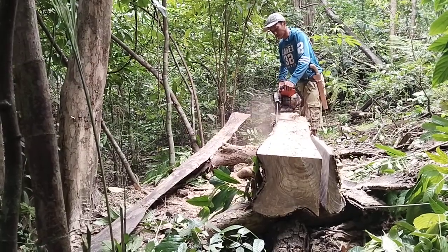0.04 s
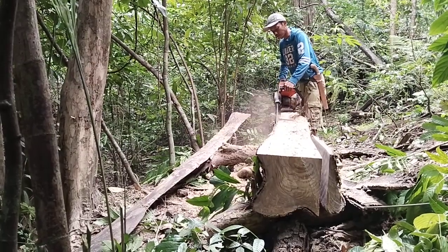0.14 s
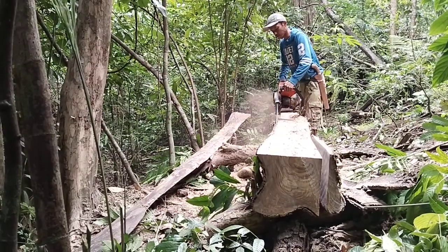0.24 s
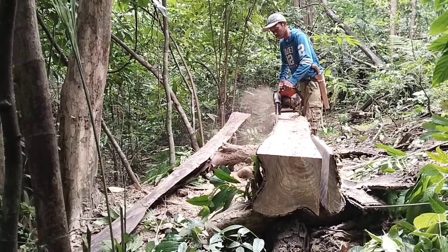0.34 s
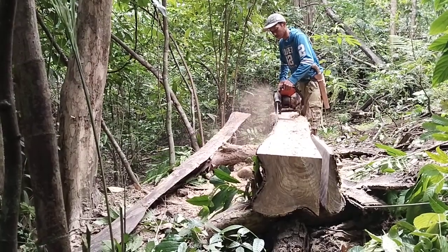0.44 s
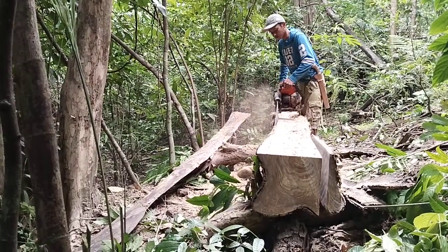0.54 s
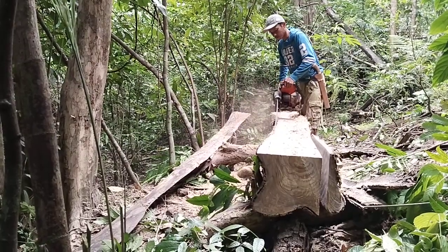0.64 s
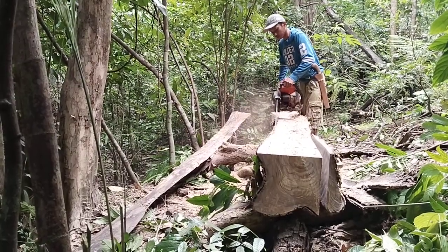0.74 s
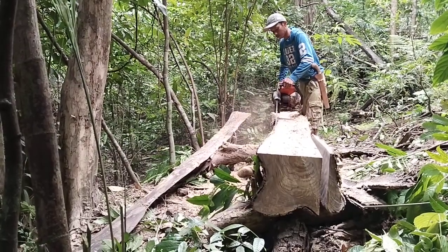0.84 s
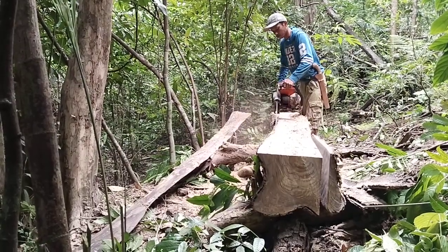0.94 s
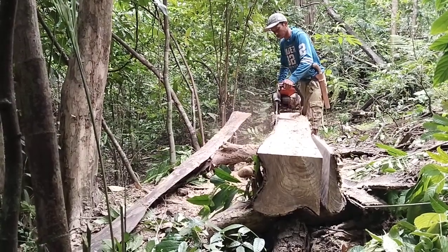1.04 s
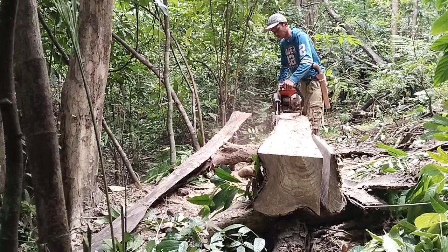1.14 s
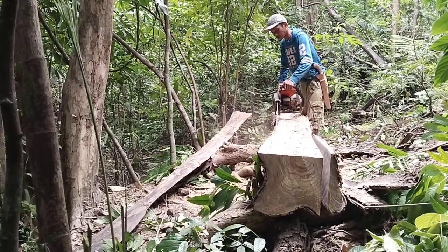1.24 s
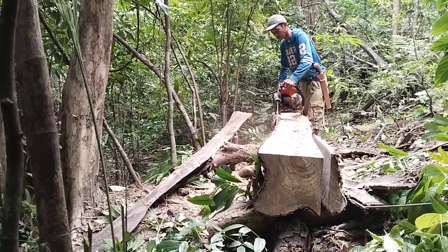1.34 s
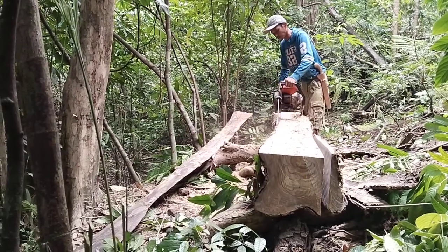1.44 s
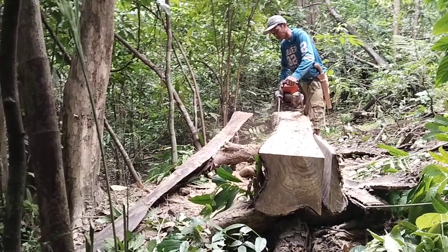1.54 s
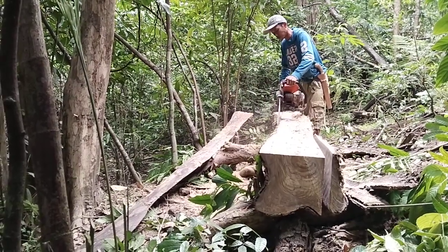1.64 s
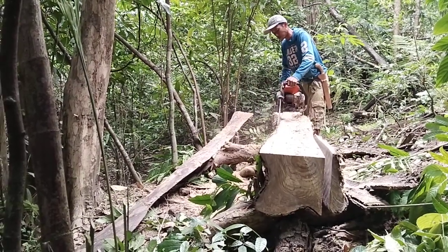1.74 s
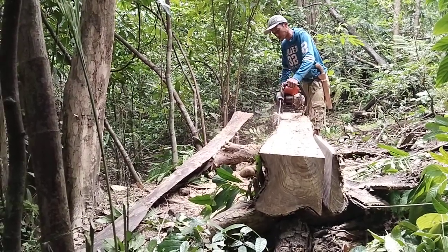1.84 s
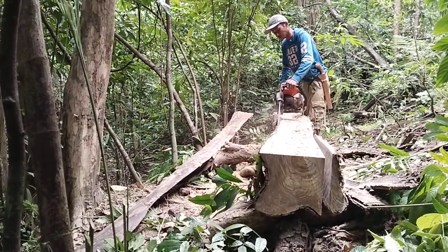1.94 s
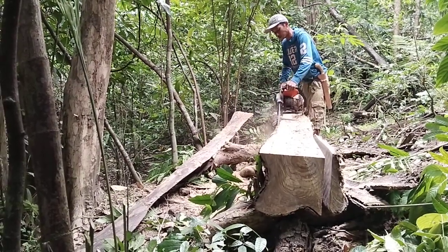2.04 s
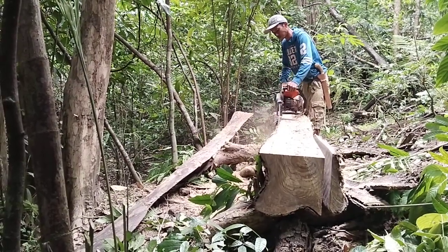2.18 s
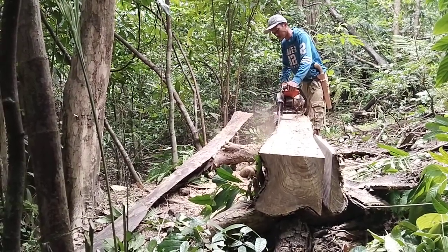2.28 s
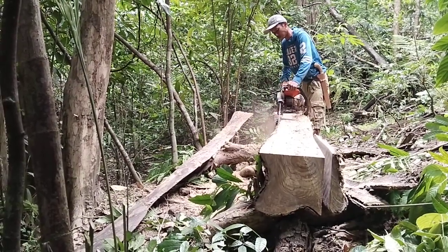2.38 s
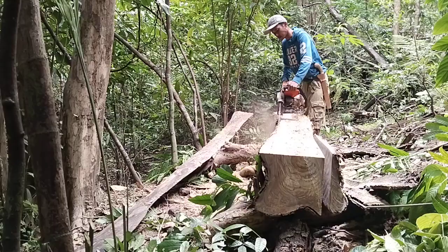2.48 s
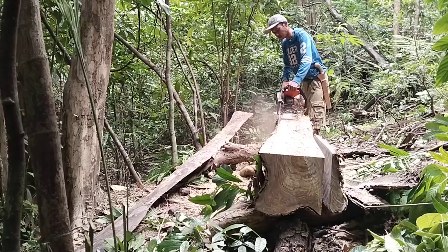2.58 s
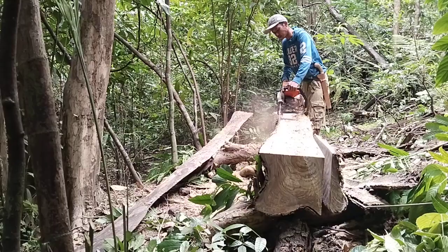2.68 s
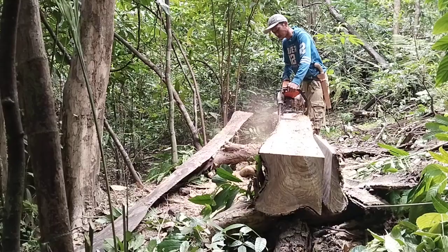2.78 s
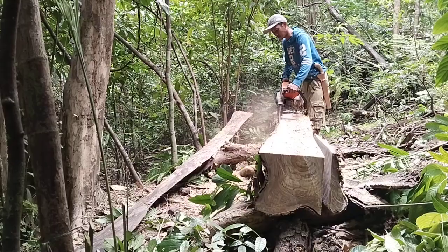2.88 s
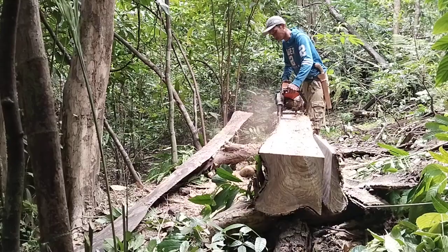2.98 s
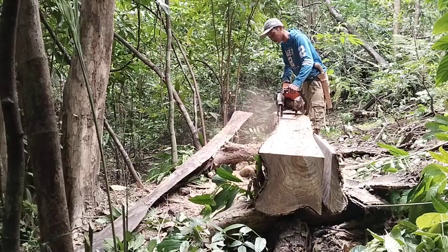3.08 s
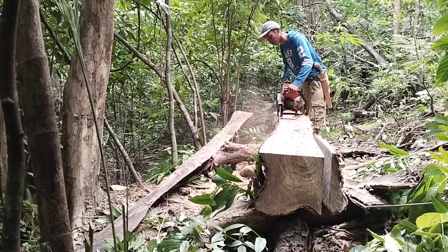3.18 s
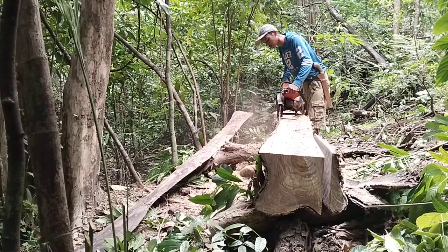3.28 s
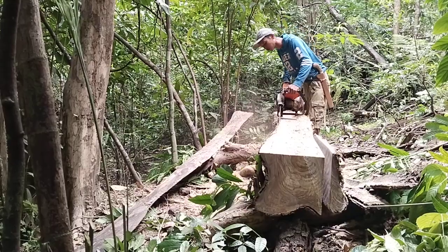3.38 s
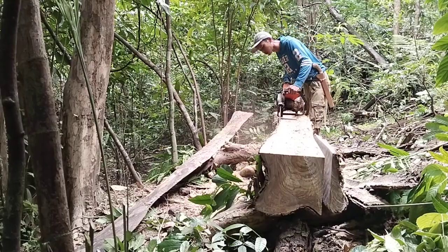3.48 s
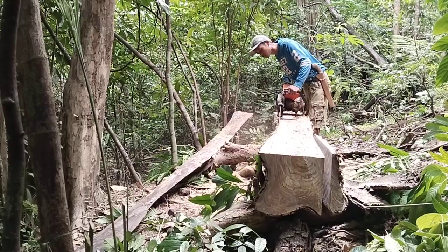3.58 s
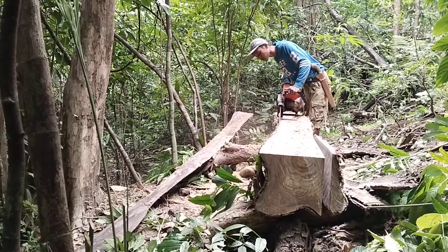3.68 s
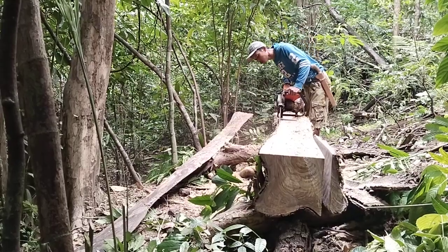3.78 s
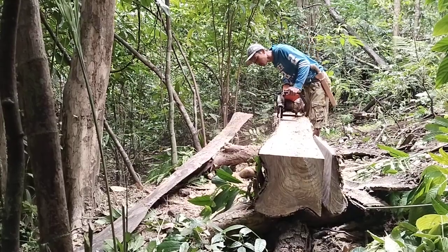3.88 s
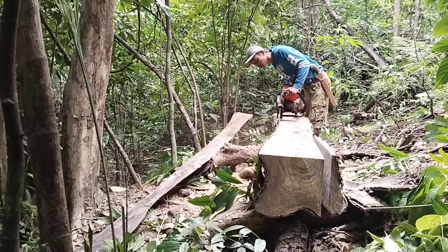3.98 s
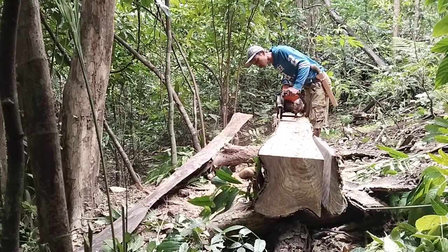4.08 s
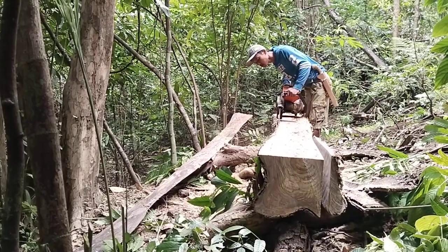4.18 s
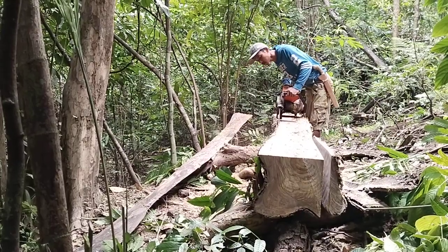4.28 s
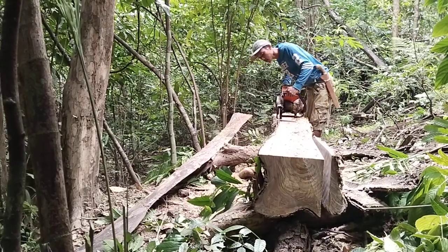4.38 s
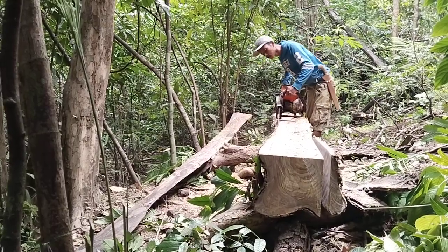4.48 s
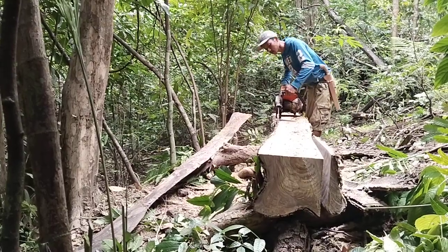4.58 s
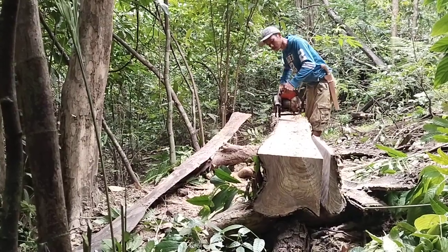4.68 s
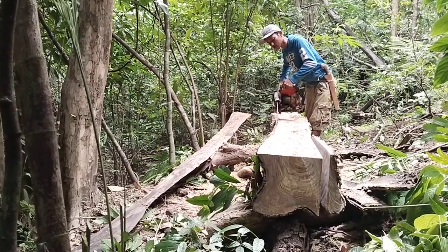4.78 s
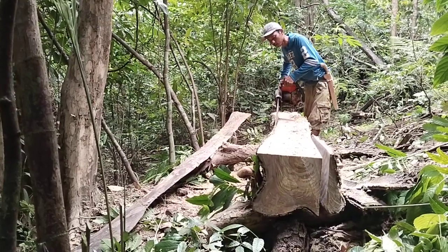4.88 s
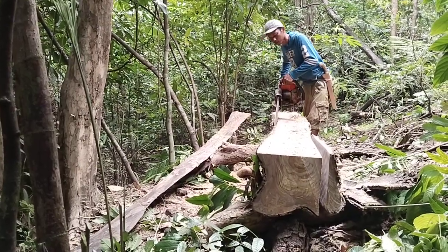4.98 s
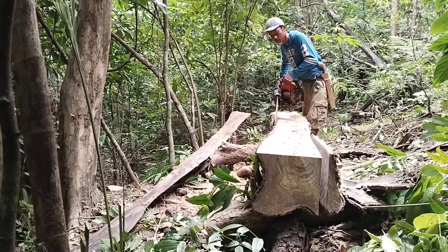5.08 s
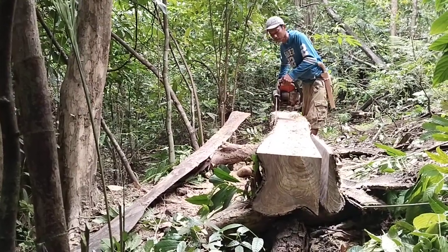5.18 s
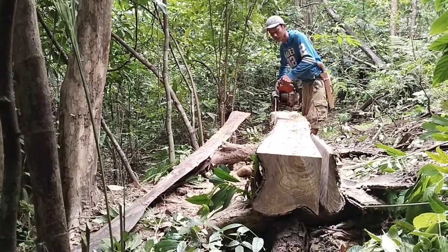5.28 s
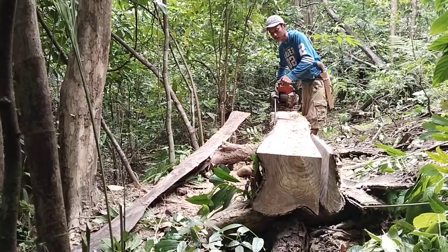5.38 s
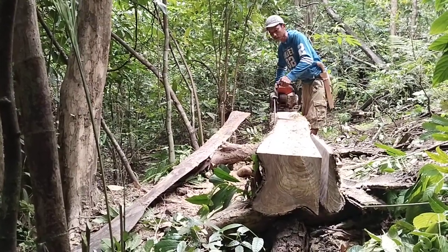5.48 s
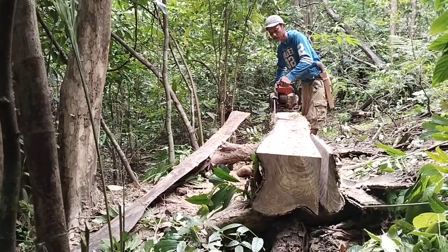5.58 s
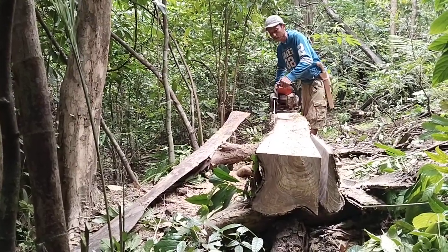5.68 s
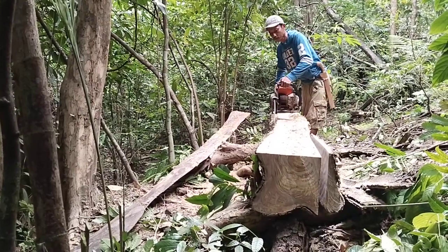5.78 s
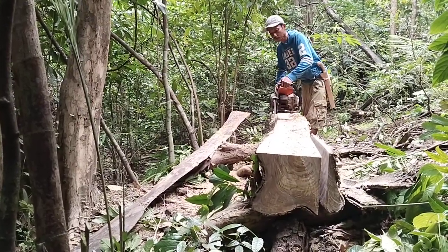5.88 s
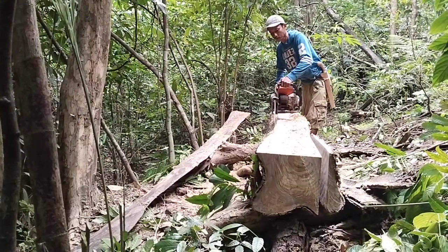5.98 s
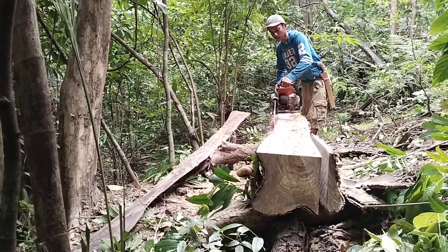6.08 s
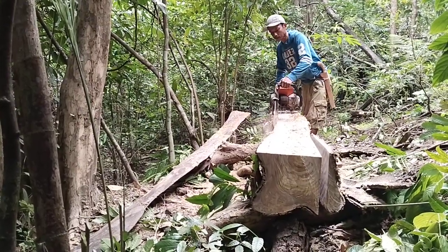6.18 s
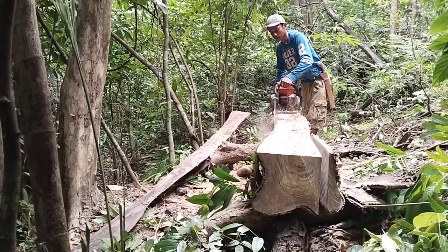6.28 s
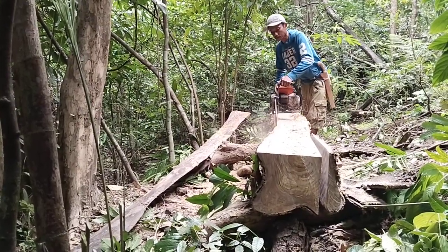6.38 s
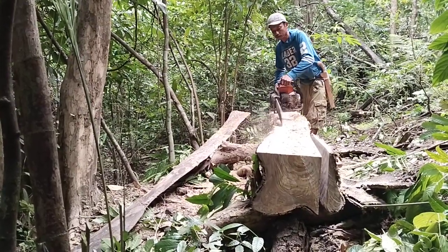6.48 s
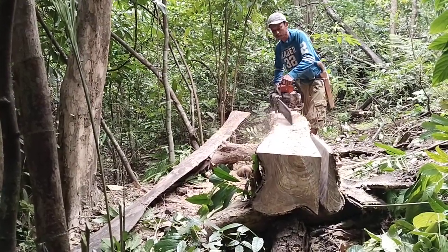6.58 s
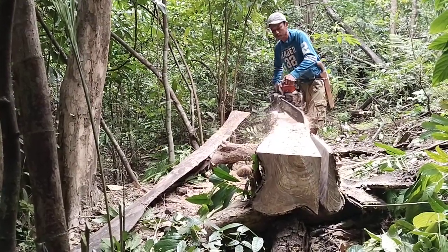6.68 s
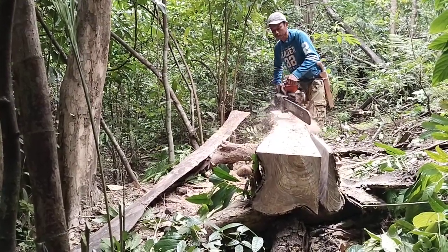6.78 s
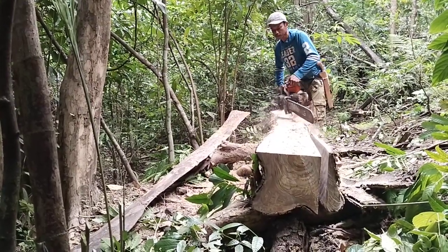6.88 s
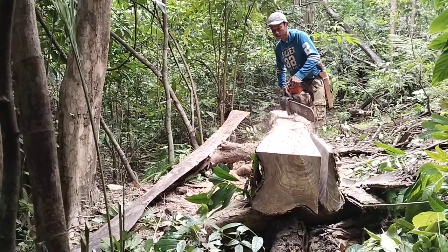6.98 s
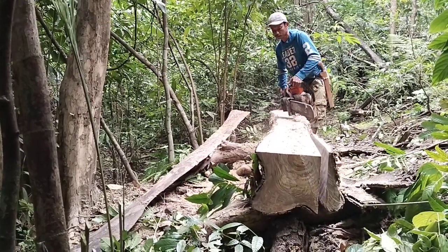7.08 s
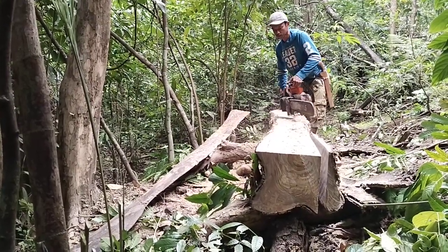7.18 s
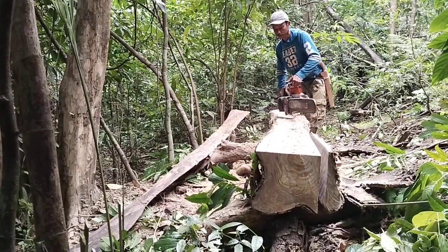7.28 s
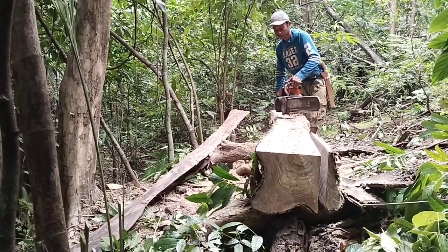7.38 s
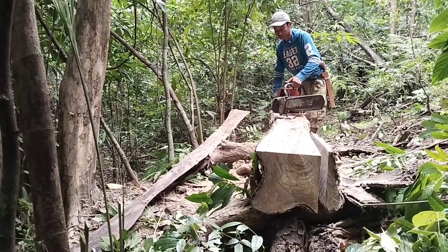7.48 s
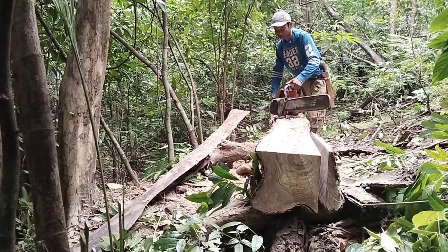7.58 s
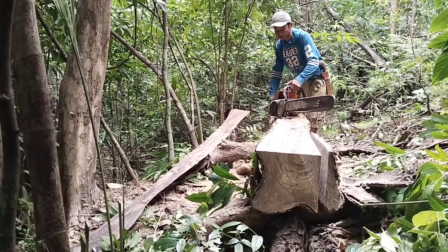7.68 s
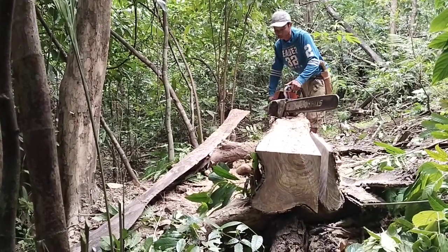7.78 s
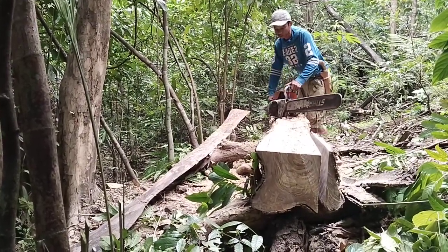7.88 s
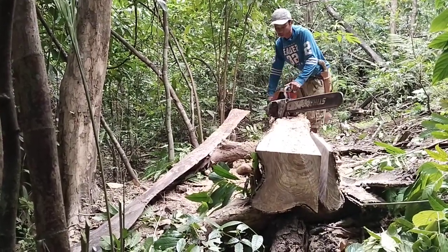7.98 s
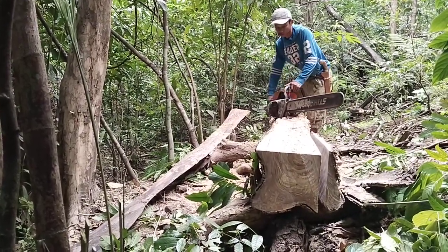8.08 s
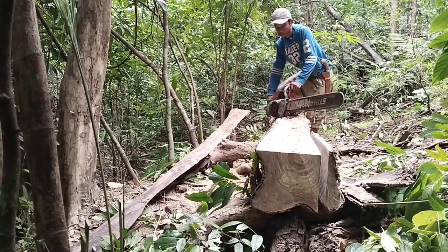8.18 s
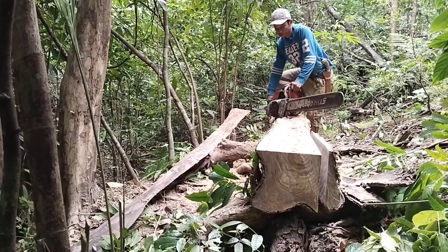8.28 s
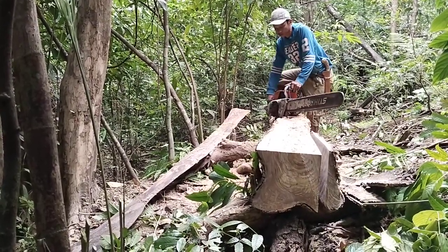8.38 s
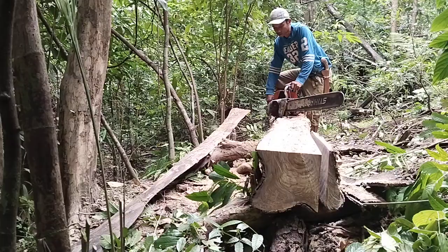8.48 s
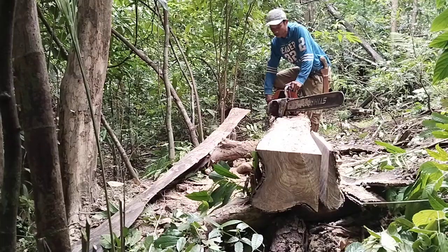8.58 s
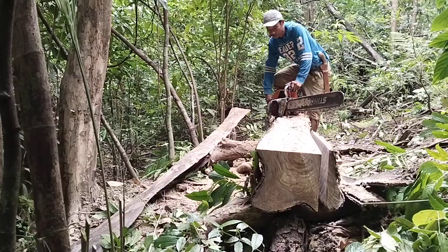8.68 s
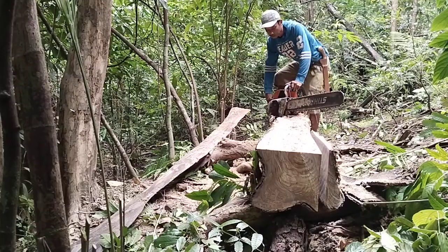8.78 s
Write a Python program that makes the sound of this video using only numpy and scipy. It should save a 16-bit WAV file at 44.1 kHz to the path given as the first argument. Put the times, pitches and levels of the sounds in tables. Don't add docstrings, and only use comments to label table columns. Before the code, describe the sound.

A two-stroke chainsaw works in a forest clearing, heard in mono from a few metres away. It begins at high revs, a harsh buzzing snarl, and sags from 0.3 s. At about 1 s the throttle opens again, stuttering slightly, then pulls into a bright crackling scream until 2.2 s. Another pull follows from 2.4 to 2.8 s, with a quick stab near 2.9 s. The pitch then slides down into a hollow, much quieter putter by 4 to 5 s, with loose metallic ticking, faint chain hiss and small pops. Short blips bark at 5.2 and 5.5 s, then a rougher pull climbs from 5.7 to 6.4 s with misfires and chain brushing wood. It coasts down to slow, uneven chugging and light rattles through about 8.8 s. Brief trunk echoes and very soft forest air surround it.

```python
import sys
import numpy as np
from scipy import signal
from scipy.io import wavfile
from scipy.ndimage import uniform_filter1d

SR = 44100
rng = np.random.default_rng(int(sys.argv[2]) if len(sys.argv) > 2 else 0)


def invert_db(x):
    u = np.asarray(x, float) / 20
    return 10 ** u


def file_out(sig):
    cols = np.atleast_2d(sig).T
    lim = np.clip(cols, -1, 1)
    pcm = np.round(lim * 32767).astype(np.int16)
    wavfile.write(sys.argv[1], SR, pcm)


N = 389844


def evened(x):
    return x / np.sqrt(np.mean(x ** 2) + 1e-20)


def columns(rows, at):
    first, *others = np.transpose(rows)
    return [np.interp(at, first, values) for values in others]


def coloured(x, points, swell=0):
    hz = np.abs(np.fft.fftfreq(8192, 1 / SR))
    f, db = np.transpose(points)
    gain_db = np.interp(np.log(hz + 1), np.log(f), np.maximum(db, -70), -70, -70)
    log_gain = np.log(invert_db(gain_db))
    if swell:
        log_gain = uniform_filter1d(log_gain, size=9, mode="wrap")
    phase = -(1 - np.clip(swell, 0, 1)) * signal.hilbert(log_gain).imag
    response = np.fft.ifft(np.exp(log_gain + 1j * phase)).real
    taps = np.roll(response, 1024)[:5120]
    return signal.oaconvolve(x, taps / np.linalg.norm(taps))[1024:N + 1024]


def ringing(x, modes):
    out = 0
    for hz, width, db in modes:
        pole = np.exp((2j * hz - width) * np.pi / SR)
        out = out + invert_db(db) * signal.lfilter([np.sqrt(1 - abs(pole) ** 2)], [1, -pole], x).real
    return out


def train(times, sizes):
    at = np.clip(times * SR, 0, N)
    whole, part = at.astype(int), at % 1
    early = np.bincount(whole, sizes * (1 - part), N + 2)
    late = np.bincount(whole + 1, sizes * part, N + 2)
    return (early + late)[:N]


def puffs(clicks, decay_s):
    r = np.exp(-1 / (decay_s * SR))
    return signal.lfilter([np.sqrt(1 - r * r)], [1, -r], clicks) * rng.standard_normal(N)


HEAT_FROM, HEAT_SPAN = 81, 62
HEAT_RISE = 1.052


def warmed(moments, sizes, length, points, swell):
    heat = np.clip((1 / length - HEAT_FROM) / HEAT_SPAN, 0, 1)
    raised = [(hz * HEAT_RISE, db) for hz, db in points]
    cool_part = coloured(train(moments, sizes * (1 - heat)), points, swell)
    hot_part = coloured(train(moments, sizes * heat), raised, swell)
    return cool_part + hot_part


# opens t/s, shuts t/s, closing time t/s, opening [0-1]
THROTTLE = [
    (0, .335, .06, 1),
    (.97, 1.185, .03, 1),
    (1.16, 1.29, .01, .68),
    (1.29, 2.2, .07, 1),
    (2.37, 2.8, .08, 1),
    (2.865, 2.965, .05, 1),
    (5.22, 5.365, .012, 1),
    (5.49, 5.6, .04, 1),
    (5.675, 6.375, .16, 1),
]
# from t/s, aim [turns/s], inertia t/s
DRIVE = [(0.0, 154.9, 0.458), (0.317, 30.1, 0.89), (0.98, 109.6, 0.227), (1.157, 101.1, 0.527),
         (1.532, 148.8, 0.528), (2.145, 35.5, 0.87), (2.392, 141.9, 0.384), (2.766, 78.6, 1.092),
         (2.847, 135.3, 0.198), (2.887, 23.4, 1.025), (3.65, 20.4, 0.836), (4.478, 27.2, 0.341),
         (5.214, 70.5, 0.225), (5.362, 29.3, 0.905), (5.504, 73.4, 0.528), (5.667, 131.8, 0.84),
         (6.402, 42.7, 0.557), (7.021, 6.1, 1.329), (7.834, 25.1, 0.336)]
START_SPEED, START_TURN = 130.2, .112


def crank():
    t, speed, now = np.arange(N) / SR, np.zeros(N), START_SPEED
    ends = [row[0] for row in DRIVE[1:]] + [N / SR]
    for (start, aim, inertia), end in zip(DRIVE, ends):
        settling = aim + (now - aim) * np.exp(np.minimum(start - t, 0) / inertia)
        speed = np.where(t >= start, settling, speed)
        now = aim + (now - aim) * np.exp((start - end) / inertia)
    turns = START_TURN + np.cumsum(speed) / SR
    moments = np.interp(np.arange(1, turns[-1]), turns, t)
    squeezes = []
    for opens, shuts, closing, wide in THROTTLE:
        shutting = np.clip(.5 + (shuts - moments) / closing, 0, 1)
        squeezes.append(wide * (moments > opens) * shutting)
    return moments, np.gradient(moments), np.max(squeezes, axis=0), speed


# speed [turns/s], muffler blow level/dB, crack level/dB, thump level/dB
BURNING = [(30, -21.5, -32.5, -42), (52.6, -20, -35, -42.5), (68, -16.5, -33, -43.5), (90, -15.5, -25, -41),
           (118, -16.5, -19.5, -40), (130, -15.5, -23, -41.5), (138, -16, -22, -48.5)]
# speed [turns/s], muffler blow level/dB, crack level/dB, thump level/dB
COASTING = [(26.2, -41.5, -55, -46.5), (36, -36, -49.5, -47), (47.7, -32.5, -49, -44.5),
            (63.5, -26, -35.5, -46.5), (90, -27.5, -34.5, -44.5), (132, -22, -35.5, -47)]
# first missed turn t/s, misses [count], step from miss to miss [turns]
MISFIRES = [(.99, 2, 1), (1.025, 1, 1), (1.307, 4, 2), (1.408, 4, 2), (2.179, 1, 1), (2.379, 2, 2),
            (5.265, 1, 1), (5.982, 2, 1), (6.02, 1, 1), (6.174, 2, 2), (6.314, 2, 2)]
LEAN_TURNS = [1.048, 1.286, 1.388, 1.398, 1.519, 1.559, 2.148, 2.887, 2.903, 5.588, 5.785, 5.815, 6.152,
              6.163, 6.219]
# t/s, level/dB
POPS = [(1.013, 3), (1.296, 3), (1.317, 2), (1.337, 2), (2.387, 3), (4.151, 2), (5.417, 6), (5.44, 6),
        (5.484, 5), (4.491, 2), (4.653, 3), (4.682, 4), (4.834, 6), (4.963, 5), (4.997, 4), (5.031, 4),
        (5.065, 6), (5.607, 5), (5.627, 11), (5.666, 6), (5.684, 2), (6.367, 3), (6.429, 7), (7.938, 4),
        (8.166, 4), (8.305, 4), (8.641, 9)]
MISS_DB, LEAN_DB, CATCH_DB = (-5.5, -12.5), (0.5, -3.5), (-1.5, 2.5)
LIFT_THUMP_DB = -6.5


def charges(moments, length, throttle):
    hot = np.array(columns(BURNING, 1 / length))
    cold = np.array(columns(COASTING, 1 / length))
    blow_db, crack_db, thump_db = cold + (hot - cold) * throttle ** np.array([[1], [2], [1]])

    def turn(s):
        return np.argmin(abs(moments - s))

    missed, lean = np.zeros(len(moments)), np.zeros(len(moments))
    burn = (throttle > .5) * 1.
    for s, misses, stride in MISFIRES:
        missed[turn(s):turn(s) + misses * stride:stride] = 1
    lean[[turn(s) for s in LEAN_TURNS]] = 1
    catch = np.roll(missed + lean, 1) * (1 - missed - lean) * burn
    burn = burn * (1 - missed)
    change = np.outer(MISS_DB, missed) + np.outer(LEAN_DB, lean) + np.outer(CATCH_DB, catch)
    for s, db in POPS:
        change[:, turn(s)] += db
        burn[turn(s)] = max(burn[turn(s)], (db - 3) / 10)
    thump_db = thump_db + LIFT_THUMP_DB * 4 * throttle * (1 - throttle)
    return blow_db + change[0], crack_db + change[1], thump_db, burn


# f/Hz, level/dB
HOT_MUFFLER = [(250, -42.5), (340, -28), (420, -28.5), (500, -16.5), (640, -7), (780, 2), (890, -6),
               (1020, -11), (1180, -23), (1330, -37), (1800, -54)]
# f/Hz, level/dB
COLD_MUFFLER = [(250, -49), (340, -30), (430, -25), (510, -1.5), (600, -12), (690, -10), (770, 1),
                (870, -3), (1000, -12.5), (1150, -11), (1300, -34), (1800, -58.5)]
# f/Hz, level/dB
CLOSING = [(350, -49.5), (520, -20), (600, -12), (680, -3), (760, 0.5), (850, -9.5), (960, -24),
           (1500, -56)]
# f/Hz, level/dB
JET = [(3500, -36), (4300, -11.5), (5000, -3.5), (5600, -0.5), (6600, 4), (7400, -4), (8400, -3.5),
       (9500, -17.5), (10700, -20.5)]
SWELL = 0.31
COLD_OPEN_DB, CLOSE_DB, CLOSE_DB_PER_SPEED, CLOSE_TURN = -4.5, 2, -0.0376, .44


def muffler(moments, length, blow_db, burn):
    chance = rng.standard_normal((len(moments), 2))
    uneven_db = (.4 + 30 * length * (1 - burn)) * chance[:, 0]
    blow = invert_db(blow_db + uneven_db + 60 * length * (1 - burn))
    burnt = blow * np.sqrt(burn)
    idle = blow * np.sqrt(1 - burn) * invert_db(COLD_OPEN_DB)
    knock_db = chance[:, 1] + CLOSE_DB + CLOSE_DB_PER_SPEED / length - 15.3 * burn
    closing = train(moments + CLOSE_TURN * length, blow * invert_db(knock_db))
    opening = invert_db(18.5) * warmed(moments, burnt, length, HOT_MUFFLER, SWELL / 2)
    pumping = warmed(moments, idle, length, COLD_MUFFLER, SWELL) + coloured(closing, CLOSING, 0.7)
    gusts = train(moments, burnt) + train(moments, idle) + closing
    breath = coloured(puffs(gusts, .005), COLD_MUFFLER)
    jet_size = invert_db(blow_db + 2.5 * chance[:, 1] + 5 * np.roll(1 - burn, 1)) * burn ** 2
    jet_size = jet_size * np.minimum(length * 60, 1.2) ** 1.3
    jet = coloured(puffs(train(moments, jet_size), .004), JET)
    return opening + invert_db(18.0) * pumping + invert_db(-5) * breath + invert_db(6) * jet


# f/Hz, level/dB
HOT_CRACK = [(1100, -60), (1300, -31), (1450, -6.5), (1630, -1), (1760, -14), (1900, -4), (2150, -14),
             (2450, -0.5), (2750, -5), (3050, -2.5), (3320, 2), (3470, -34), (4200, -58)]
# f/Hz, level/dB
WARM_CRACK = [(1100, -48), (1300, -16), (1600, 5.5), (1750, -9.5), (1950, 2.5), (2200, -6.5), (2500, 1.5),
              (2750, -9), (3050, -7.5), (3400, -19), (4200, -52)]
# f/Hz, level/dB
COLD_CRACK = [(1100, -50), (1300, -19), (1600, -3.5), (1740, -3.5), (1840, 9.5), (1960, -12), (2200, -5.5),
              (2480, -7), (2700, -17), (2850, -33), (3300, -14), (3600, -33), (4500, -58)]


def baffled(clicks):
    echoes = .75 * np.roll(clicks, 100) + .4 * np.roll(clicks, 190)
    return clicks + echoes + .3 * puffs(clicks, .005)


def cracks(moments, length, crack_db, burn):
    chance_db = .7 * rng.standard_normal(len(moments))
    crack = invert_db(crack_db + 120 * length * (1 - burn) + chance_db)
    heat = np.clip((1 / length - 80) / 40, 0, 1)
    unburnt = crack * np.sqrt(1 - burn)
    hot = baffled(train(moments + 0.00139, crack * np.sqrt(burn * heat)))
    warm = baffled(train(moments + 0.001657, crack * np.sqrt(burn * (1 - heat))))
    casing = warmed(moments, unburnt, length, COLD_CRACK, SWELL)
    port_closing = .25 * train(moments + .43 * length, unburnt) + .2 * puffs(train(moments, unburnt), .015)
    burnt_sound = invert_db(15.5) * coloured(hot, HOT_CRACK) + invert_db(18.5) * coloured(warm, WARM_CRACK, SWELL)
    return burnt_sound + invert_db(18.5) * (casing + coloured(port_closing, COLD_CRACK))


# f/Hz, level/dB
HOT_THUMP = [(18, -68), (30, -33), (86, -1), (125, -8), (190, -1), (292, -8), (322, -19.5), (420, -14.5),
             (550, -38), (920, -120)]
# f/Hz, level/dB
COLD_THUMP = [(30, -72), (64, -21.5), (108, -15.5), (150, -8), (195, 1), (250, -4.5), (295, -7), (340, -24),
              (450, -15), (560, 2.5), (800, -49)]


def crankcase(moments, length, burn, thump_db):
    size = np.sqrt(length * SR) * invert_db(.4 * rng.standard_normal(len(moments)))
    missed = uniform_filter1d(burn, size=5) * (1 - burn)
    cold_size = size * np.sqrt(1 - burn) * invert_db(-8 * missed)
    hot = coloured(train(moments + .001, size * burn), HOT_THUMP)
    cold = coloured(train(moments + .0015, cold_size), COLD_THUMP, SWELL / 2)
    return invert_db(thump_db + 1.23) * (hot + cold)


# speed [turns/s], level/dB
CHAIN_RUN = [(26, -55), (50, -51.5), (80, -46), (100, -40), (120, -34.5), (140, -33.5)]
# middle t/s, half length t/s, level/dB
BRUSHES = [
    (4.6, 0.39, 3.5),
    (5.304, 0.15, 13.5),
    (5.91, 0.48, 10),
    (7.86, 0.35, 4.5),
    (8.247, 0.17, 1),
]
CUT_MUFFLE_DB, CUT_LAG_S = -3.5, 0.25


def chain_level(moments, throttle, speed):
    t = np.arange(N) / SR
    pull = uniform_filter1d(np.interp(t, moments, throttle), int(CUT_LAG_S * SR))
    brush = sum(db * np.clip(1 - abs(t - s) / half, 0, 1) for s, half, db in BRUSHES)
    return columns(CHAIN_RUN, speed)[0] + CUT_MUFFLE_DB * pull + brush


# f/Hz, level/dB
CHAIN = [(1940, -2), (3300, -13), (3410, -4.5), (3570, -7.5), (4000, -6), (4610, -7.5), (5480, -3.5),
         (5780, -8.5), (5980, -3.5), (6550, -8), (7150, -4), (8420, -6.5), (9190, -8), (10500, -36),
         (13600, -51), (22000, -120)]
# f/Hz, width/Hz, level/dB
BAR = [(6610, 130, -7), (8280, 170, -6.5)]


def chain(hiss_db):
    ticks = evened(rng.standard_normal(N) * invert_db(2.1 * rng.exponential(1, N)))
    patches = evened(uniform_filter1d(rng.standard_normal(N), 900))
    scrape = coloured(ticks, CHAIN) + ringing(rng.standard_normal(N), BAR)
    return invert_db(hiss_db - 2.5 + 0.79 * patches) * scrape


# from t/s, to
# t/s, f/Hz, width/Hz, level/dB
TURN_TONES = [(0.014, 0.89, 5580, 85, -41.5), (1.93, 3.3, 5590, 85, -44), (3.3, 4.897, 3365, 58.3, -59.5),
              (3.3, 5.228, 5665, 90.5, -55.5), (4.328, 4.8, 6450, 120, -58.5), (7.55, 8.155, 6470, 90, -52),
              (7.645, 8.417, 5860, 109, -53.5), (7.3, 8.703, 1784, 90, -59.5), (7.302, 8.296, 3160, 80, -61),
              (7.4, 8.7, 4400, 120, -69.5), (8.025, 8.84, 8550, 70, -64.5), (8.166, 8.862, 7070, 60, -54.5),
              (8, 8.84, 10530, 194, -71)]


def turn_tones(moments, length):
    hits = invert_db(2.64 * rng.standard_normal((len(moments), len(TURN_TONES))))
    hits = hits * np.sqrt(length * SR)[:, None]
    out = np.zeros(N)
    for hit, (start, end, hz, width, db) in zip(hits.T, TURN_TONES):
        swell = np.clip(np.minimum(moments - start, end - moments) / 0.12, 0, 1)
        knocks = puffs(train(moments, hit * swell), 0.0077)
        out += ringing(knocks, [(hz, width, db)])
    return out


# f/Hz, fading time t/s
TRUNKS = [(200, 0.34), (800, 0.18), (3000, 0.49), (9000, 0.022)]


def trunks(x):
    at = np.arange(300, SR // 2, 22)
    taps = np.zeros(SR)
    taps[at + rng.integers(0, 22, len(at))] = rng.choice([-1., 1.], len(at))
    hz, t, bands = signal.stft(taps, SR, nperseg=256)
    fading_s = np.interp(hz, *np.transpose(TRUNKS))[:, None]
    tail = signal.istft(bands * invert_db(-60 * t / fading_s), SR, nperseg=256)[1]
    return signal.fftconvolve(x, tail / np.linalg.norm(tail))[:N]


# f/Hz, level/dB
FOREST = [(40, -30), (200, -12), (700, -4), (1900, 0), (3000, -8), (6000, -6), (9000, -10), (10700, -28)]
FOREST_DB = -60


def forest():
    return invert_db(FOREST_DB) * coloured(rng.standard_normal(N), FOREST)


LEAD_S, ECHO_DB = .0018, -13


def scene():
    moments, length, throttle, speed = crank()
    blow_db, crack_db, thump_db, burn = charges(moments, length, throttle)
    thump_db = np.interp(np.arange(N) / SR, moments, thump_db)
    hiss_db = chain_level(moments, throttle, speed)
    moments = moments - LEAD_S
    saw = muffler(moments, length, blow_db, burn)
    saw += cracks(moments, length, crack_db, burn)
    saw += crankcase(moments, length, burn, thump_db)
    saw += chain(hiss_db) + turn_tones(moments, length)
    return (saw + invert_db(ECHO_DB) * trunks(saw) + forest())[None]


def top_cut(x):
    return signal.sosfilt(signal.butter(12, 15500, fs=SR, output="sos"), x)


# f/Hz, level/dB
MIRROR = [(12300, -70), (13400, -11), (14600, -0.5), (15400, -9), (15600, -75)]
MIRROR_DB, BAND_HZ = -48, 10680


def record(dry):
    low_pass = signal.firwin(401, BAND_HZ, window=("kaiser", 9), fs=SR)
    kept = signal.oaconvolve(dry[0], low_pass, "same")
    flipped = kept * (-1) ** np.arange(N)
    image = invert_db(MIRROR_DB) * coloured(flipped, MIRROR)
    return top_cut((kept + image)[None])


dry = scene()
out = record(dry)
file_out(out)
```